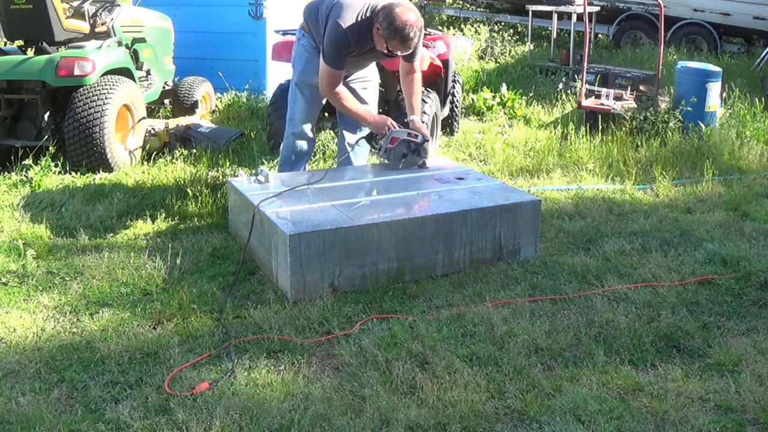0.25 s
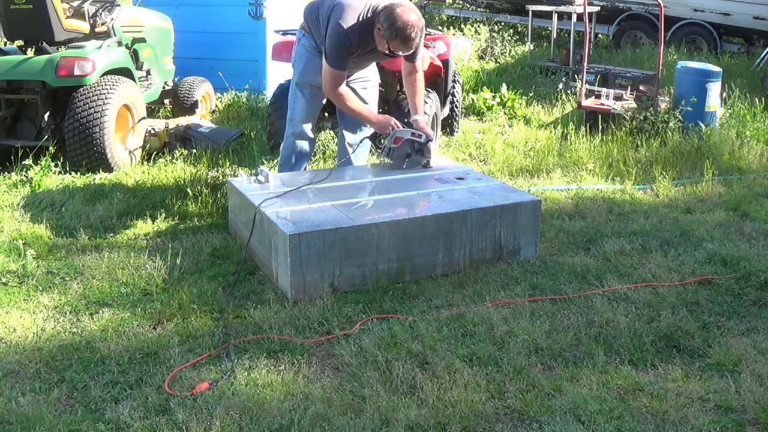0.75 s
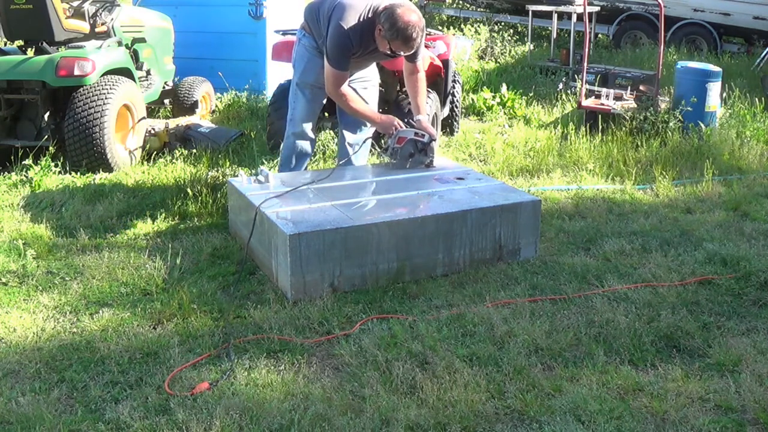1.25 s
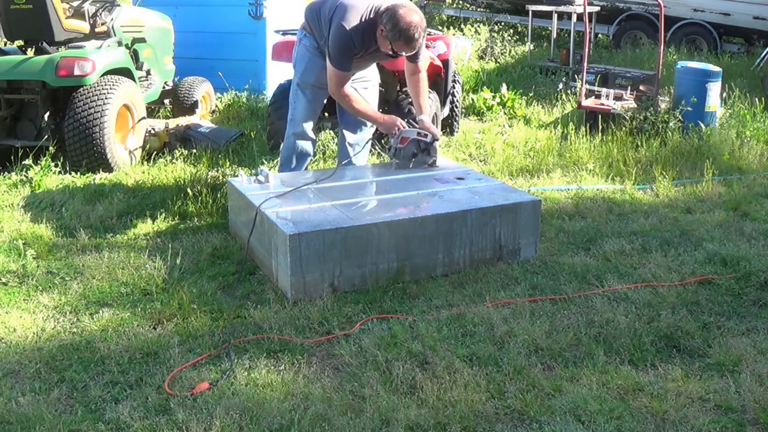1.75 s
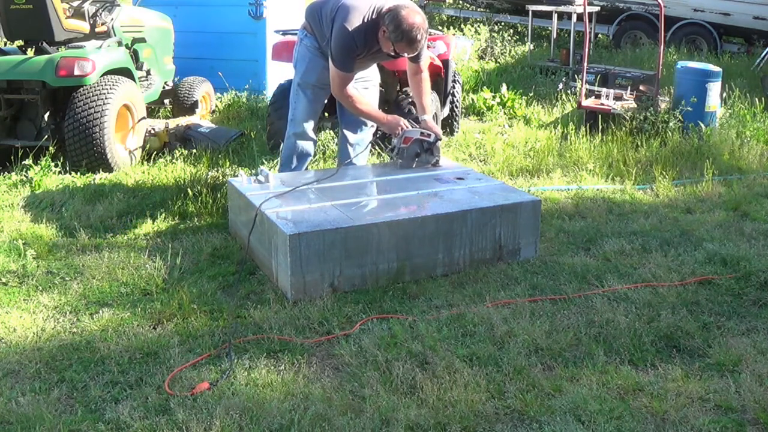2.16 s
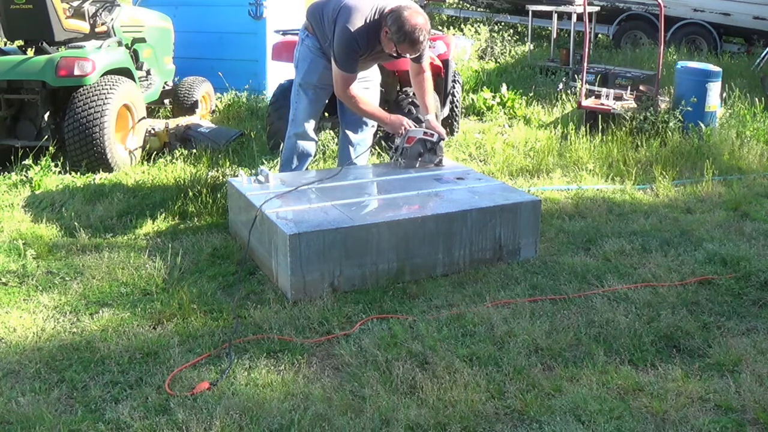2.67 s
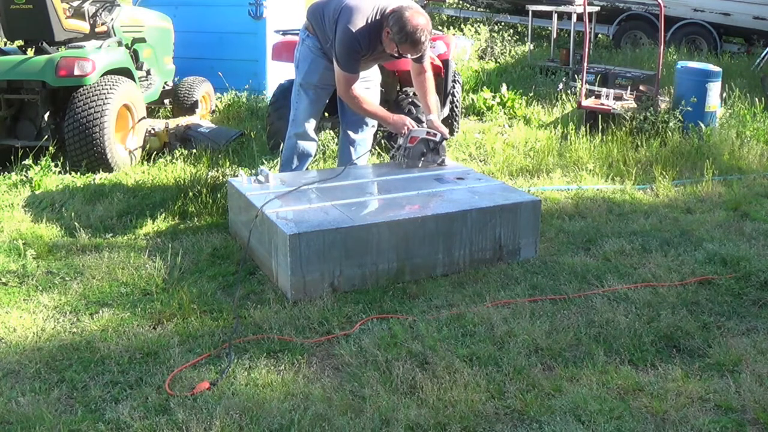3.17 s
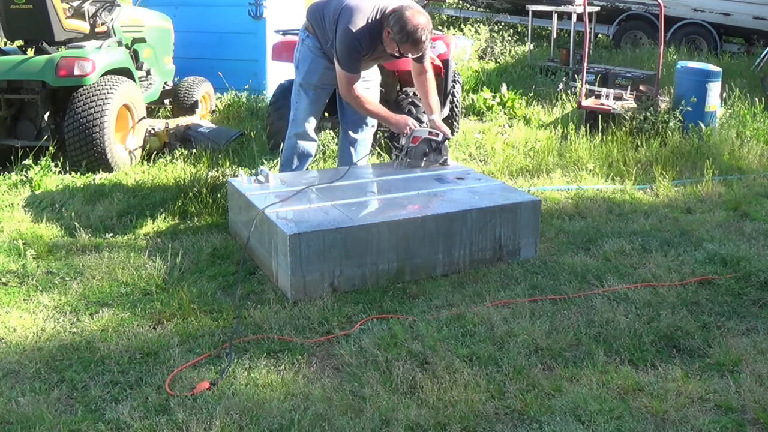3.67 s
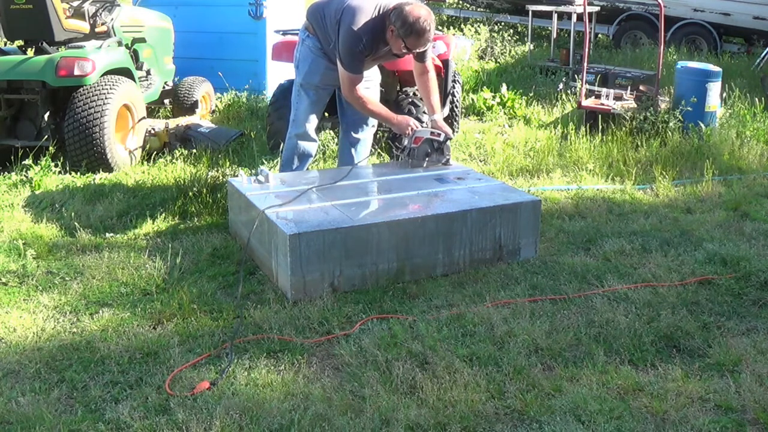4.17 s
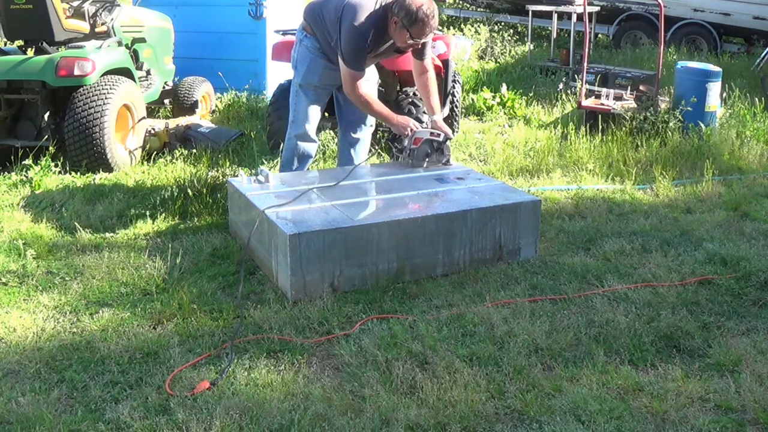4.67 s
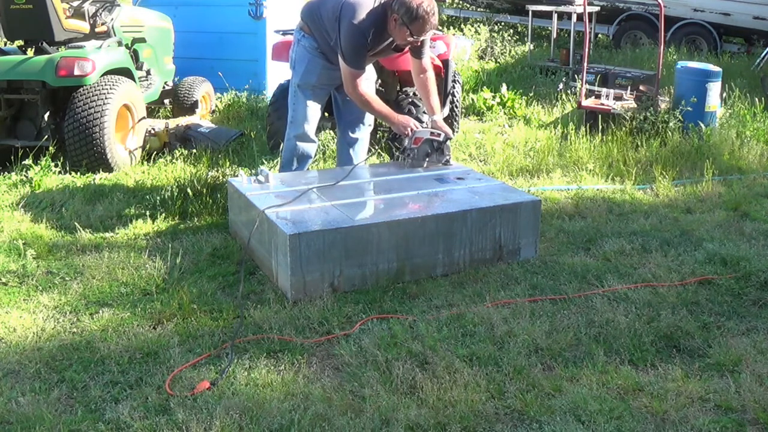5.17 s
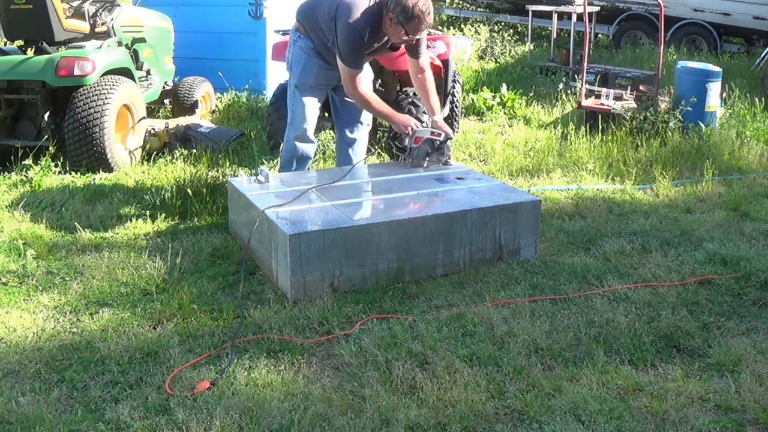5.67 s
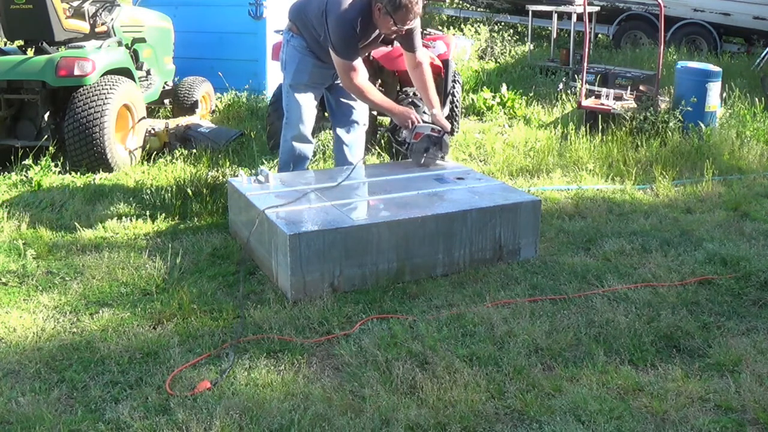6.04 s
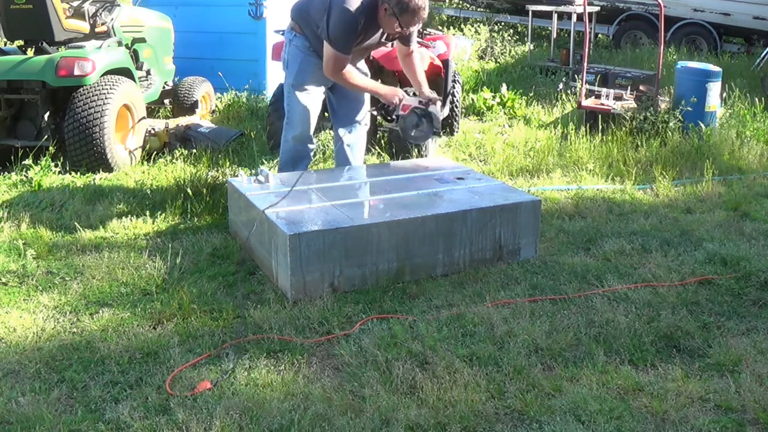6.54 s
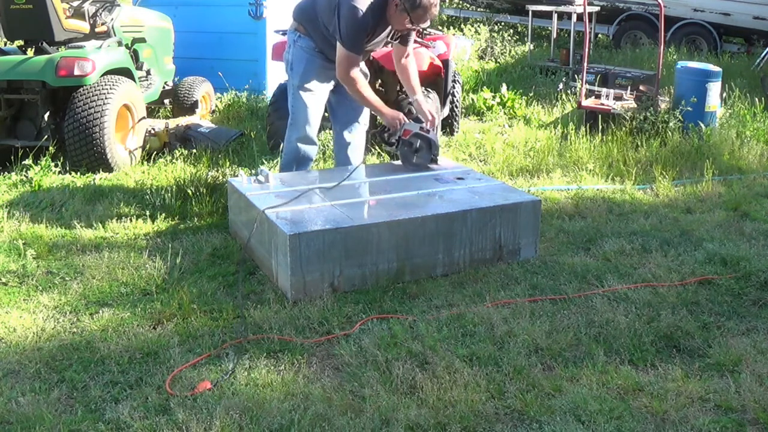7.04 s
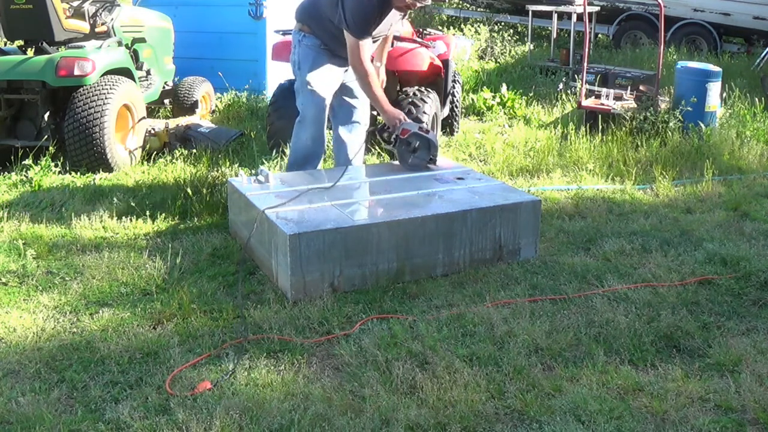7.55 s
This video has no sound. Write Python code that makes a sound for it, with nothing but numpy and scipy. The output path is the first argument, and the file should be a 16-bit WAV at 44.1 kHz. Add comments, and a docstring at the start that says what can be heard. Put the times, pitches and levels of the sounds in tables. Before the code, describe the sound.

From 0 s a circular saw is already cutting thin sheet metal at full force, close to the microphone in an open yard: a piercing, rough whine near 2.4 kHz inside a dense rattle, gritty rasp and bright hiss. The pitch wavers with the load, rising around 1.8 s and again after 3 s. Narrow squeals flare near 2-2.8 s and 2.9-3.6 s; a rougher chatter and a droning loose flap join around 4 s. The whine races up to about 4.6 s, when the motor is switched off. The blade coasts downward, still scraping, then pinches and grinds in a juddering halt just before 6 s. Near silence follows, with slight yard echoes, faint air and a barely audible high whistle. Hollow metal knocks come at about 6.4-6.55, 6.7, and 7.03 s, the last with a strong dull crack, then a weak touch near 7.25 s as the still blade rings softly on.

```python
"""A circular saw screams close by, already cutting the thin sheet metal of a tank in a yard.
Its tones follow the tooth strike rate, and noise bursts at each bite shake sheet and blade; squeals and a flap join in.
The motor is switched off, the blade coasts down, and the slot pinches the slowing teeth to a grinding halt.
As the saw is put down it knocks on the tank in clusters of contacts, and the still blade rings on.
Behind it all lie scattered yard echoes, faint outdoor air and a thin high electronic whistle."""
import sys
import numpy as np
from scipy import signal
from scipy.fft import rfft, irfft, next_fast_len
from scipy.io import wavfile
from scipy.ndimage import uniform_filter1d, minimum_filter1d, map_coordinates

SR = 44100
rng = np.random.default_rng(int(sys.argv[2]) if len(sys.argv) > 2 else 0)


def master(y):
    """Save y as 16-bit WAV."""
    cut = np.clip(np.atleast_2d(y).T, -1, 1)
    pcm = np.round(cut * 32767)  # scale
    wavfile.write(sys.argv[1], SR, pcm.astype(np.int16))


N = 344421

# The saw hitting the tank. Each row: time in seconds, boom in dB, crack in dB, contact hardness in Hz.
KNOCK_CONTACTS = [(6.371, -42, -49.5, 1000), (6.386, -15.5, -25, 15000), (6.391, -20, -27.5, 9000),
                  (6.454, -31, -31, 3000), (6.534, -47, -36, 2500), (6.562, -43.5, -40, 2000),
                  (6.715, -22, -22, 3200), (6.735, -44, -31, 1500), (7.028, -21.5, -8.5, 800),
                  (7.061, -23.5, -21, 900), (7.242, -42.5, -50.5, 1000)]
OFF_S = 4.6  # the motor is switched off


def amp(db):
    """Decibels to gain."""
    return 10 ** (np.asarray(db) / 20)


def unit(x):
    """Scale to rms 1."""
    return x / np.sqrt(np.mean(x ** 2) + 1e-20)


def along(points, hz):
    """(Hz, value) points read on a log axis."""
    f, v = np.transpose(points)
    return np.interp(np.log(hz + 1), np.log(f + 1), v)


def curves(rows):
    """One value per sample for each column after the time."""
    s, *cols = np.transpose(rows)
    return [np.interp(np.arange(N) / SR, s, c) for c in cols]


def ramp(start, length):
    """Rises from 0 to 1 over length seconds."""
    return np.clip((np.arange(N) / SR - start) / length, 0, 1)


def wobble(rate):
    """A smooth random curve, rate knots a second."""
    knots = rng.standard_normal(int(N * rate / SR) + 4)
    return map_coordinates(knots, [np.arange(N) * rate / SR])


def filtered(x, response):
    """x times a response of frequency."""
    m = next_fast_len(N + SR // 4)
    hz = np.fft.rfftfreq(m, 1 / SR)
    return irfft(rfft(x, m) * response(hz), m)[..., :N]


def resonances(modes, hz, between_db):
    """Gain of (Hz, width, dB) resonances standing on a bed of dense weaker ones."""
    power = amp(between_db) ** 2
    for centre, width, db in modes:
        power = power + amp(db) ** 2 / (1 + (2 * (hz - centre) / width) ** 2)
    return np.sqrt(power)


def rush(spectrum, drive=1, modes=(), between_db=0):
    """Random force of strength drive through a resonant body: stereo, rms 1."""
    # Each row: frequency in Hz, left-right likeness from 0 to 1.
    likeness = [(60, 1), (150, 0.69), (380, 0.86), (950, 0.91), (2380, 1), (5980, 1), (15000, 0.99)]

    def response(hz):
        turn = np.arccos(np.clip(along(likeness, hz), -1, 1)) / 2
        mid_side = np.array([np.cos(turn), np.sin(turn)])
        return amp(along(spectrum, hz)) * resonances(modes, hz, between_db) * mid_side

    mid, side = filtered(drive * rng.standard_normal((2, N)), response)
    return unit(np.array([mid + side, mid - side]))


def fuzzy(phase, width_hz):
    """A randomly driven resonance: narrow noise of rms 1 around a running phase."""
    knots = rng.standard_normal((2, int(N * width_hz / SR) + 2))
    clock = np.arange(N) * width_hz / SR
    real, imag = [np.interp(clock, np.arange(len(k)), k) for k in knots]
    phase = (phase % (2 * np.pi)).astype(np.float32)
    return unit(real * np.cos(phase) + imag * np.sin(phase))


def tooth_rate():
    """Strikes per second: the blade works under power, coasts down against drag and is braked by the slot."""
    # Blade speed before coasting and braking. Each row: time in seconds, tooth strikes per second in Hz.
    powered_speed = [(0.0, 2408), (0.31, 2490), (0.5, 2459), (0.75, 2329), (0.92, 2349), (1.02, 2467),
                     (1.41, 2292), (1.69, 2728), (1.82, 2786), (2.04, 2558), (2.5, 2483), (2.56, 2572),
                     (2.77, 2582), (3.09, 2856), (3.32, 2765), (3.71, 3116), (4.11, 3026), (4.39, 3640),
                     (4.42, 3904), (4.6, 4106)]
    drag_per_s, stop_s, brake_s = 1.18, 5.995, .115
    t = np.arange(N) / SR
    coast = np.exp(-drag_per_s * np.maximum(t - OFF_S, 0))
    # the pinch brakes the blade ever harder, to rest
    brake = 1 - np.exp(np.minimum(t - stop_s, 0) / brake_s)
    return curves(powered_speed)[0] * coast * brake


def cut_levels(tooth_hz):
    """The level in dB of each sound of the cut, from pressure, speed and the grip of the teeth."""
    # How hard the teeth are pressed into the sheet. Each row: time in seconds, pressure in dB.
    pressure = [(0, 1), (.6, -.5), (.85, 2), (1.4, 2), (1.9, -1), (2.75, -0.5), (3.1, -3), (4.1, -0.5),
                (4.41, 0), (4.47, -4.5), (4.6, -8), (4.7, 0), (5.07, -4), (5.16, 0), (5.45, -4.5),
                (5.65, 2.5), (5.73, -2), (5.88, 7.5), (5.95, 3)]
    # How each sound follows the work. Each entry, by name: base level in dB, dB per dB of pressure,
    # dB per octave of speed, dB while coasting loose, ring-out t60 in seconds.
    laws = { "rattle": (-29.5, 1, 0, -.5, 0.29), "rasp": (-24, 0.8, 2.2, -4.3, 0.2),
            "hiss": (-19, 0.41, 3, -5.5, 0.12), "tooth": (-31.5, .5, 1.2, -11, .1),
            "octave": (-35.5, .4, 1.6, -11.5, 0.26), "overtones": (-41, .5, -4.5, -9, 0.14),
            "fan": (-40, 0.64, .6, 5, 0.03), "flap": (-44, 0.66, 0.8, .5, 0.25), }
    working_hz = 2600  # strike rate at which speed changes no level
    unload_s = .1  # the teeth lose their grip
    bind_s, bind_rise_s = 5.5, .2  # the slot begins to pinch the blade
    last_bite_s = 5.925  # from here the cut only rings out
    pressure_db, = curves(pressure)
    octaves = np.log2(np.maximum(tooth_hz / working_hz, 1 / 10))
    loose = ramp(OFF_S, unload_s) - ramp(bind_s, bind_rise_s)
    idle_s = np.maximum(np.arange(N) / SR - last_bite_s, 0)
    levels = {}
    for name, (db, per_pressure, per_octave, loose_db, t60) in laws.items():
        worked_db = db + per_pressure * pressure_db + per_octave * octaves
        levels[name] = worked_db + loose_db * loose - 60 * idle_s / t60
    return levels


def blade_motion(count=40):
    """Tooth phase, turn phase, strike rate and sound levels of a blade with count teeth."""
    tooth_hz = tooth_rate()
    # nearly stalled, the blade jerks from tooth to tooth
    judder = .12 * ramp(start=5.84, length=.08) * wobble(260)
    unsteady = 1 + 0.002 * wobble(35) + judder
    tooth = 2 * np.pi * np.cumsum(tooth_hz * unsteady) / SR
    return tooth, tooth / count, tooth_hz, cut_levels(tooth_hz)


def singing(hz):
    """The lift in dB that the sheet gives a tone of this pitch."""
    # The sheet sings out as a tone passes. Each row: centre in Hz, half width in Hz, lift in dB.
    singing_bands = [(952, 163, 19.5), (2010, 100, 12.5), (2810, 220, 10), (3295, 80, 8.5), (4780, 90, 5),
                     (5160, 90, 6), (6150, 170, 7)]
    return sum(db * np.exp(-((hz - centre) / width) ** 2) for centre, width, db in singing_bands)


def scream(tooth, turn, tooth_hz, levels):
    """The tones of the strike rate and of the motor fan, unsteady because no two bites are equal."""
    overtone_fall_db = 4  # from one overtone to the next
    chatter_start_s, chatter_end_s, chatter_fade_s, chatter_db = 3.42, 4.33, .24, -28
    radiate_hz = 580  # the sheet hardly radiates tones below this
    bent = tooth + 0.15 * np.sin(turn)  # the blade runs slightly out of true

    def partial(order, db, rough):
        tone = np.cos(order * bent) + rough * fuzzy(order * bent, width_hz=240)
        flutter_db = 6.7 * rough * wobble(28) + 1.8 * wobble(9)
        return amp(db) * unit(tone * amp(flutter_db))

    teeth = partial(order=1, db=levels["tooth"] + singing(tooth_hz), rough=0.26)
    teeth += partial(order=2, db=levels["octave"] + singing(2 * tooth_hz), rough=.4)
    # a slowed blade strikes tooth by tooth, so its overtones grow
    for k in range(4):
        teeth += partial(order=3 + k, db=levels["overtones"] - overtone_fall_db * k, rough=.7)
    # every second tooth bites deeper
    chattering = ramp(chatter_start_s, chatter_fade_s)
    chattering = chattering - ramp(chatter_end_s - chatter_fade_s, chatter_fade_s)
    chatter = partial(order=1 / 2, db=chatter_db - 6.5, rough=.3)
    chatter += partial(order=3 / 2, db=chatter_db, rough=0.46)
    fan = partial(order=7 / 12, db=levels["fan"], rough=.45)  # geared to the blade
    tones = (teeth + chattering * chatter) * (1 + 0.05 * np.cos(turn)) + fan
    return filtered(tones, lambda hz: hz ** 4 / np.hypot(hz ** 4, radiate_hz ** 4))


def blade_song(turn):
    """The spinning blade's modes, each swelling on its own."""
    # Waves running round the rim shift with its spin.
    # Each row: frequency at rest in Hz, Hz gained per turn a second, level in dB.
    rim_waves = [(7390, -1, -10), (8080, 0, -7), (8460, 1, -1), (9210, 1, -1), (9500, 2, -6), (9730, 2, -7),
                 (10020, 1, 0), (10240, 6.6, 1.5), (10990, 2, -7), (11370, 3, -7), (11460, 11, -4),
                 (12930, -5, -5), (13300, 1, -10)]
    clock = 2 * np.pi * np.arange(N) / SR
    song = np.zeros(N)
    for hz, shift, db in rim_waves:
        song += amp(db + 1.6 * wobble(5)) * fuzzy(hz * clock + shift * turn, width_hz=150)
    return unit(song)


def grind(tooth, turn, levels):
    """Each tooth tears off a chip; the bursts swell once a turn and shake sheet and blade."""
    # Noise colours of the cut, low to high. Each row: frequency in Hz, density in dB per Hz.
    rattle_spectrum = [(35, -64.5), (60, -35.5), (233, -29.5), (401, -24.5), (487, -19), (567, -16.5),
                       (732, -4), (960, -2), (1200, -3.5), (1420, -5.5), (1650, -8.5), (2010, -7),
                       (2200, -11), (2860, -37.5), (4840, -120)]
    rasp_spectrum = [(900, -40), (1700, -9), (2300, -1.5), (3300, -1), (4500, 2), (5500, -2), (6500, -1.5),
                     (7100, -7.5), (8500, -35)]
    hiss_spectrum = [(5500, -34.5), (7000, -10.5), (7600, -7), (8200, 0.5), (9500, 1), (10400, -1),
                     (12200, -2.5), (13000, -7), (13700, -5), (14500, -12.5), (15600, -14.5)]
    # Resonances of the sheet beside the cut. Each row: frequency in Hz, width in Hz, level in dB.
    sheet_modes = [(335, 30, 1), (490, 30, -2), (780, 70, -4), (975, 80, 0), (1100, 60, -4),
                   (1450, 120, -5), (2000, 110, -1), (2800, 100, 1), (3330, 130, 0), (3930, 150, -1),
                   (4600, 170, -1), (5650, 180, -2), (6490, 180, 0)]
    swell = unit(amp(0.44 * np.cos(turn) + 0.32 * np.cos(2 * turn) + 1.0 * wobble(300)))
    bite = (1 + 0.43 * np.cos(tooth)) * swell
    rattle_gain = amp(levels["rattle"] + 0.9 * wobble(22))
    rattle = rattle_gain * rush(rattle_spectrum, bite, sheet_modes, between_db=-2.5)
    rasp_gain = amp(levels["rasp"] + 0.7 * wobble(22))
    rasp = rasp_gain * rush(rasp_spectrum, bite, sheet_modes, between_db=-4.5)
    hiss_gain = amp(levels["hiss"] + 0.4 * wobble(16))
    chips = amp(-4) * rush(hiss_spectrum, bite)
    hiss = hiss_gain * (chips + amp(-3.5) * swell * blade_song(turn))
    return rattle + rasp + hiss


def flap_drone(level_db):
    """The cut-free flap of sheet hums at its own pitches and comes loose into a louder drone."""
    # Each row: frequency in Hz, width in Hz, level in dB.
    flap_modes = [(985, 80, 0), (2800, 140, -6)]
    clock = 2 * np.pi * np.arange(N) / SR
    drone = np.zeros(N)
    for hz, width, db in flap_modes:
        drone += amp(db + 1.4 * wobble(14)) * fuzzy(hz * clock, width)
    rise_db = 10.5 * ramp(start=3.9, length=.5)
    return amp(level_db + rise_db) * drone


def squeals():
    """Steady narrow tones flare up and flutter during the cut."""
    # The one near 4274 Hz lies near one and a half times the tooth rate.
    # Each row: start in seconds, end in seconds, frequency in Hz, level in dB before the flutter.
    squeal_rows = [(0.2, .55, 8100, -35.5), (1.97, 2.68, 4605, -29.5), (1.9, 2.81, 10970, -29),
                   (2.848, 3.6, 4274, -31), (2.93, 3.514, 8520, -28.5), (4.3, 4.76, 11030, -26.5),
                   (4.413, 4.72, 12380, -25.5), (4.5, 4.697, 8250, -27.5), (5.58, 5.87, 10330, -30)]
    t = np.arange(N) / SR
    out = np.zeros(N)
    for start, end, hz, db in squeal_rows:
        swell = np.clip(np.minimum(t - start, end - t) / 0.049, 0, 1)
        out += amp(db) * swell * fuzzy(2 * np.pi * hz * t, width_hz=130)
    return out * amp(2.02 * wobble(30) - 1.5)


def travelling(x, patchy_db):
    """As the saw travels it meets ever different dense modes of the sheet, which lift and sink narrow bands."""
    z = signal.stft(x, nperseg=1024)[2]
    field = uniform_filter1d(rng.standard_normal(z.shape[1:]), size=3, axis=0)
    field = uniform_filter1d(uniform_filter1d(field, size=16, axis=1), size=7, axis=1)
    patches = unit(amp(patchy_db * unit(field)))
    return signal.istft(z * patches, nperseg=1024)[1][:, :N]


def yard(x):
    """Scattered echoes from the things standing around, treble dying first."""
    # Each row: frequency in Hz, t60 in seconds.
    echo_decay = [(150, .6), (1000, 0.62), (4000, .35), (12000, .2)]
    hz, t, z = signal.stft(rng.standard_normal((2, SR // 2)), SR, nperseg=256)
    fading = amp(-60 * t / along(echo_decay, hz)[:, None])
    tail = signal.istft(z * fading, SR, nperseg=256)[1]
    return signal.fftconvolve(x[None], tail / np.linalg.norm(tail[0]), axes=1)[:, :N]


def outdoor_air():
    """Faint outdoor air: steady shaped noise under a slow level curve."""
    # Each row: frequency in Hz, density in dB per Hz.
    air_spectrum = [(15, -48.5), (25, -18), (66, -2.5), (163, 3.5), (655, -11), (790, -2.5), (1000, -3.5),
                    (1580, -16.5), (3930, -14), (4380, -10.5), (5880, -22), (15000, -22)]
    # Each row: time in seconds, level in dB.
    air_level = [(6.0, -62.5), (6.3, -62.5), (7.0, -63.5), (7.8, -59)]
    return amp(curves(air_level)[0]) * rush(air_spectrum)


def dying(starts, levels_db, t60, attack):
    """Amplitude envelope of blows that rise and die away, their powers summed."""
    t = np.arange(SR) / SR
    shape = amp(-60 * t / t60) * (1 - np.exp(-t / attack))
    power = np.zeros(N + SR)
    for s, db in zip(starts, levels_db):
        power[round(s * SR):][:SR] += (amp(db) * shape) ** 2
    return np.sqrt(power[:N])


def knocks():
    """Each blow cracks on the sheet, pushes its wide panel and sets the tank booming."""
    # Resonances of the tank. Each row: frequency in Hz, width in Hz, level in dB.
    tank_modes = [(440, 100, -24), (1005, 83, 2.5), (1310, 49, -1.5), (1540, 84, -7.5), (1806, 32, -2.5),
                  (2040, 45, -2.5), (2340, 30, -28), (2770, 90, -8.5), (3620, 29, 0.5), (4420, 140, -9)]
    # Noise colours of a blow. Each row: frequency in Hz, density in dB per Hz.
    thud_spectrum = [(40, -23.5), (130, -11.5), (260, -4.5), (450, 2.5), (700, -4), (1100, -17),
                     (2500, -42)]
    boom_spectrum = [(40, -16), (150, -6), (400, -3), (900, 8.5), (2000, 0.5), (5000, -7), (8000, -16),
                     (15000, -27.5)]
    crack_spectrum = [(200, -28.5), (1500, 1.5), (2800, -3), (4300, 2), (5500, -9), (7000, -20),
                      (15000, -30)]
    splash_spectrum = [(2000, -31), (5000, 0), (9000, -3.5), (11600, 2), (13000, -7), (15500, -13.5)]
    s, boom_db, crack_db, hardness_hz = np.transpose(KNOCK_CONTACTS)
    hardness = np.log2(hardness_hz / 1000)  # octaves above 1 kHz
    thud_db = boom_db - 11 - 3.5 * hardness  # soft contacts push the panel more
    splash_db = crack_db - 28 + 7 * hardness  # hard contacts splash more
    thud = dying(s, thud_db, t60=0.24, attack=0.0041) * rush(thud_spectrum)
    boom = dying(s, boom_db, t60=0.16, attack=.0015) * rush(boom_spectrum, 1, tank_modes, between_db=-17)
    # the loose sheet trembles on
    trembling = dying(s, boom_db - 22.5, t60=0.71, attack=.02)
    shudder = trembling * rush(boom_spectrum, 1, tank_modes, between_db=-18.5)
    crack = dying(s, crack_db, t60=0.019, attack=.0003) * rush(crack_spectrum)
    splash = dying(s, splash_db, t60=0.073, attack=.0005) * rush(splash_spectrum)
    return thud + boom + shudder + crack + splash


def blade_ring():
    """The knocks leave the stopped blade ringing like a bell; only hard contacts reach its high modes."""
    # Modes of the still blade. Each row: frequency in Hz, level in dB, t60 in seconds.
    blade_modes = [(450, -15.5, 2.45), (781, -11, 15), (1190, -17, 5.3), (1700, -18.5, 3.9),
                   (1860, -6, 0.49), (2180, -19, 1.8), (2664, -14, 1.5), (2850, -8, 0.69), (3480, -5, 0.93),
                   (4320, -7, 0.58), (5170, -15, .45), (5290, -11, 0.97), (8027, -7, 0.63),
                   (10120, -9, 0.63), (11460, -6, .25), (12700, -23, .22)]
    ring_db = -24  # against the boom
    s, boom_db, _, hardness_hz = np.transpose(KNOCK_CONTACTS)
    t = np.arange(N) / SR
    ring = np.zeros(N)
    for hz, db, t60 in blade_modes:
        blows = np.zeros(N)
        blows[np.round(s * SR).astype(int)] = amp(boom_db + ring_db) ** 2 / (1 + (hz / hardness_hz) ** 4)
        energy = signal.lfilter([1], [1, -amp(-60 / (t60 * SR)) ** 2], blows)
        tone = np.sin(2 * np.pi * (hz * t + rng.random()))
        ring += amp(db + 1.5 * wobble(7)) * np.sqrt(energy) * tone
    return ring


def scene():
    """Saw and knocks in the yard, over faint outdoor air and a thin high electronic whistle."""
    tooth, turn, tooth_hz, levels = blade_motion()
    cutting = scream(tooth, turn, tooth_hz, levels) + grind(tooth, turn, levels)
    cutting = cutting + squeals() + flap_drone(levels["flap"])
    work = travelling(cutting, patchy_db=1.5) + knocks() + blade_ring()
    echoes = amp(-28.5) * yard(work.mean(axis=0))
    whistle = amp(-69.5) * np.sin(2 * np.pi * 15735 * np.arange(N) / SR)
    return work + echoes + outdoor_air() + whistle


def record(dry):
    """The microphone's two ports differ a little in phase and level; a fast limiter and a band limit follow."""
    # Each row: frequency in Hz, phase in radians by which the left port leads.
    port_lead = [(0, 0), (340, -0.14), (1030, -0.38), (1640, -0.24), (2410, -0.56), (3620, -0.015),
                 (7490, 0.038), (8610, -0.53), (10300, -0.0), (15300, 0.0)]
    # Each row: frequency in Hz, left minus right level in dB.
    port_tilt = [(60, 0.0), (180, -3), (550, -1.5), (1650, 0), (4970, -0.5), (15000, 0)]
    ceiling, top_hz = .55, 15770  # peak amplitude the limiter aims for, band limit in Hz
    sides = np.array([[1], [-1]]) / 2  # each port takes half of the difference

    def port_response(hz):
        return amp(sides * along(port_tilt, hz)) * np.exp(1j * sides * along(port_lead, hz))

    ports = filtered(dry, port_response)
    needed = np.minimum(1, ceiling / (np.abs(ports).max(axis=0) + 1e-9))
    gain = uniform_filter1d(minimum_filter1d(needed, size=65), size=65)
    return filtered(ports * gain, lambda hz: hz < top_hz)


dry = scene()
out = record(dry)
master(out)
```